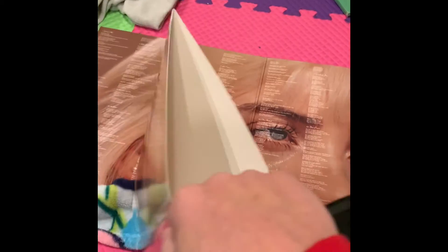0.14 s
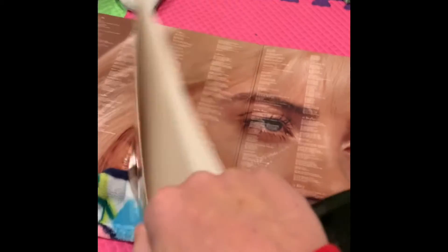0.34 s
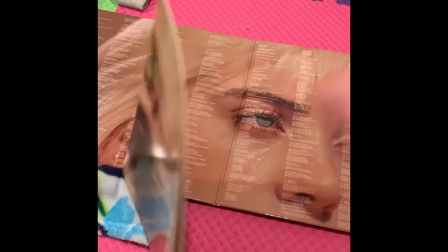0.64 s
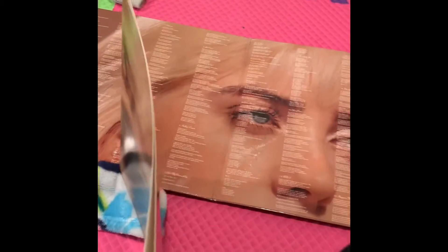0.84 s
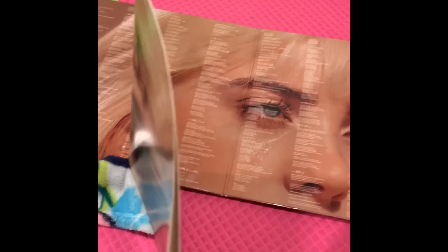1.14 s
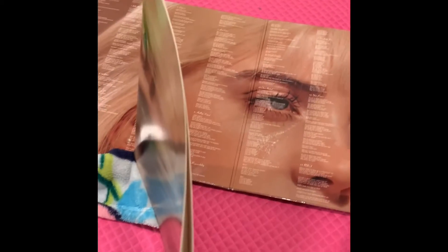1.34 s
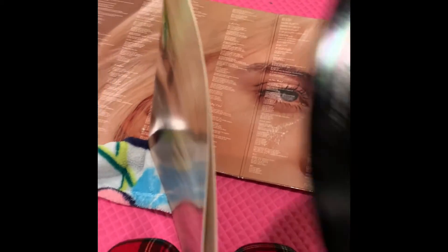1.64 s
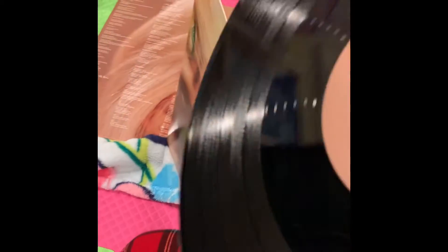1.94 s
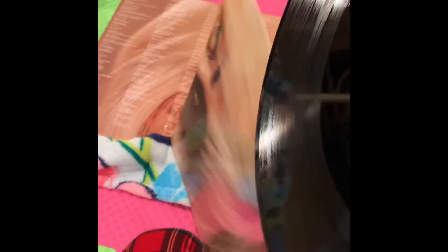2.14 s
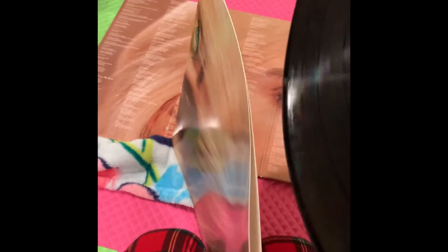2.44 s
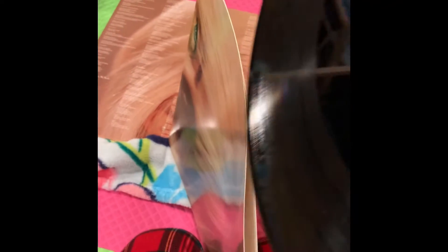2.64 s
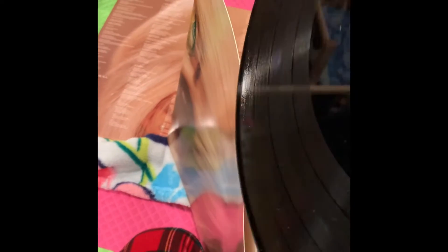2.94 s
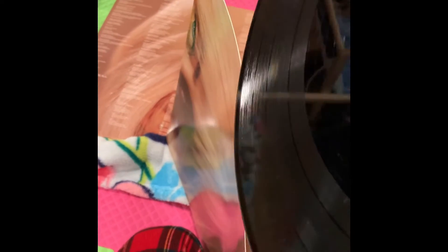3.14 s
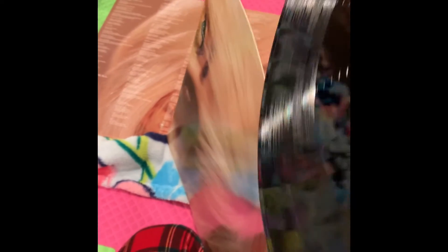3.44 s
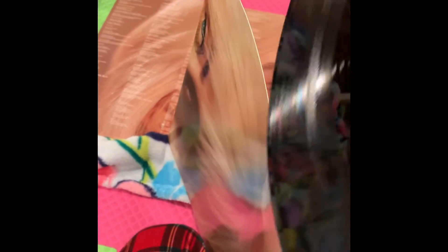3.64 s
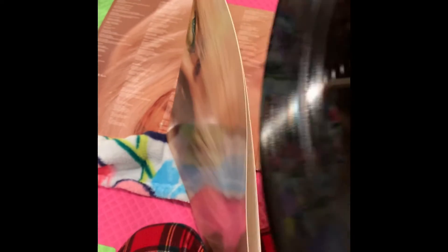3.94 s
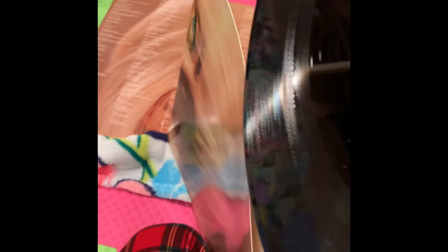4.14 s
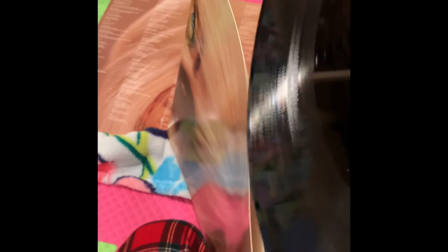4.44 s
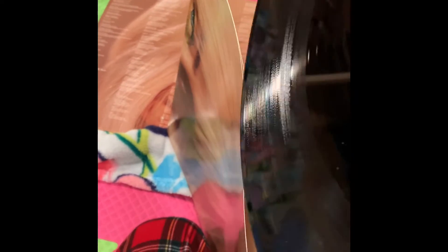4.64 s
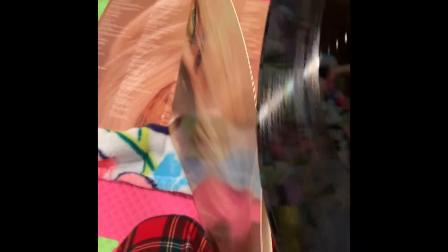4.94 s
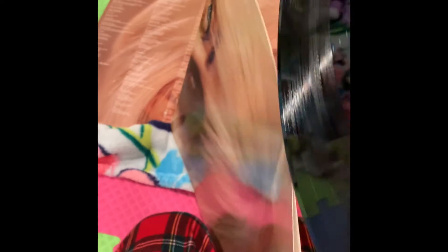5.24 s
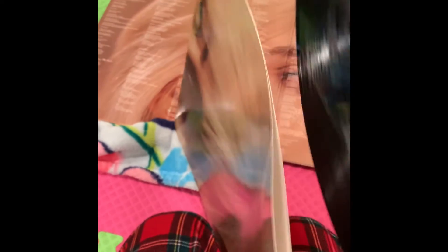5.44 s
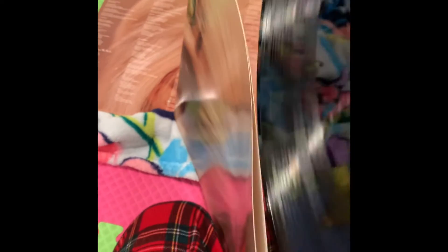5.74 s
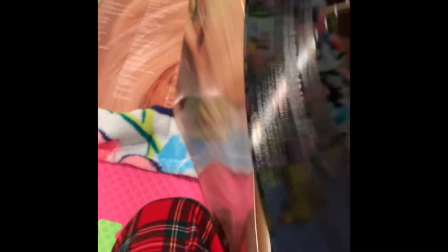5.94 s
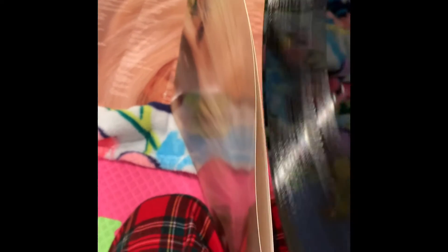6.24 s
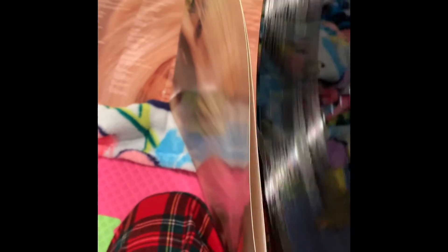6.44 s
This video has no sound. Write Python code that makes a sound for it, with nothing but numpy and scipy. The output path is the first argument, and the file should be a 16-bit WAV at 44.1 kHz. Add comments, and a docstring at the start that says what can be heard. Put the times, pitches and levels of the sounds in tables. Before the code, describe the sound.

Card jacket knocks loudly and rasps as a vinyl record is pulled out, then light disc taps and crisp paper snaps in a small room.

```python
"""In a small furnished room, a vinyl record is drawn from its card jacket and paper sleeve, close by.
Card rasps and paper hisses as they slide: noise made of many tiny clicks, shaped by each rub.
Fizzing, ticks and a short squeak join in. Knocks on the jacket and taps on the disc are bending waves,
quick falling chirps. Rumble, soft air and a faint whine lie underneath."""
import sys
import numpy as np
from scipy import signal
from scipy.fft import rfft, irfft, next_fast_len
from scipy.io import wavfile
from scipy.ndimage import uniform_filter1d

SR = 44100
rng = np.random.default_rng(int(sys.argv[2]) if len(sys.argv) > 2 else 0)


def wav_record(signal):
    """Record a signal, one row per channel, as 16-bit PCM in the file named by sys.argv[1]."""
    frames = np.transpose(np.atleast_2d(signal))
    bounded = np.clip(frames, -1, 1)
    # unit amplitude maps onto the largest positive 16-bit level
    quanta = np.round(bounded * 32767).astype(np.int16)
    wavfile.write(sys.argv[1], SR, quanta)


N = 290602
TIME = np.arange(N) / SR  # seconds

# Sliding strokes of the disc and its sleeves.
# Each row: start in seconds, length in seconds, card rasp in relative dB, paper hiss in relative dB.
STROKES = [(0, 0.059, -55, -59.5), (0.082, 0.083, -59.5, -69), (0.204, 0.1, -61, -68),
           (0.289, 0.12, -51.5, -63.5), (0.409, 0.036, -58, -59.5), (0.439, 0.07, -58, -67),
           (0.55, 0.15, -70, -76), (0.843, 0.11, -61.5, -75.5), (0.953, 0.029, -49.5, -64.5),
           (0.98, 0.14, -59.5, -76.5), (1.362, 0.049, -59.5, -72), (2.019, 0.029, -53.5, -56),
           (2.073, 0.071, -61.5, -72), (2.246, 0.078, -62.5, -73.5), (2.304, 0.012, -48, -58.5),
           (3.391, 0.088, -55.5, -56.5), (3.569, 0.076, -55.5, -55.5), (3.671, 0.024, -51.5, -63),
           (4.928, 0.14, -62.5, -73), (5.352, 0.011, -55.5, -61.5), (5.576, 0.006, -46, -54),
           (5.635, 0.092, -65, -61.5), (5.639, 0.017, -77, -51.5), (5.757, 0.019, -54.5, -59),
           (6.416, 0.03, -66, -69), (6.481, 0.046, -64, -67.5)]
# Brief scuffs of the disc's rim on paper.
# Each row: start in seconds, card rasp in relative dB, paper hiss in relative dB.
SCUFFS = [(2.677, -59.5, -73.5), (2.865, -66, -72.5), (4.041, -53.5, -71), (4.29, -43.5, -65.5),
          (4.382, -50, -68), (4.553, -57.5, -66)]
# The paper snags and lets go with a snap.
# Each row: start in seconds, card rasp in relative dB, paper hiss in relative dB.
SNAGS = [(0.78, -62, -55.5), (.948, -54, -71), (1.242, -45, -81), (1.445, -51, -67.5), (3.4047, -51, -50),
         (3.4637, -44, -42), (3.6045, -43, -42.5), (3.668, -35.5, -59), (3.696, -48, -50),
         (5.6595, -52, -36.5), (5.7605, -36, -61), (5.7785, -50, -50)]
# The jacket's panels flex and rub on each other.
# Each row: start in seconds, length in seconds, level in relative dB.
PANEL_FLEXES = [(.288, .012, -38), (.325, .02, -36), (.4, .02, -43), (.45, .08, -68), (.93, .35, -64),
                (1.335, .03, -52), (1.368, .012, -42), (4.87, .04, -67)]
# Spectra of card, paper and panels. Each row: frequency in Hz, level in relative dB.
RASP_SPECTRUM = [(100, -25), (250, -0.5), (520, -1.5), (900, -5), (1900, -3), (3000, -6.5), (3750, 0),
                 (4500, 0), (6500, -6), (16000, -63)]
HISS_SPECTRUM = [(1500, -12), (3000, -11), (3900, -11.5), (5200, -4.5), (6600, 9), (8200, 4.5), (10500, 0),
                 (12000, -6), (14000, -12.5), (16000, -13.5)]
FLEX_SPECTRUM = [(90, 2.5), (200, 6.5), (420, 5), (750, 0), (1000, -14.5), (1350, -5), (2000, -25),
                 (3200, -31), (8000, -73)]
# The disc glides along the card; the rasp ends at an edge that rises with its speed.
# Each row: time in seconds, edge in Hz, level in relative dB.
GLIDE_PATH = [(.8, 2000, -75), (.86, 2200, -65.5), (.935, 2220, -64.5), (.965, 1930, -61),
              (1.01, 2450, -64.5), (1.1, 2400, -62), (1.27, 2310, -70.5), (1.38, 1890, -86),
              (4.86, 2600, -100), (4.91, 2840, -65), (5.09, 3080, -61.5), (5.17, 2550, -68.5),
              (5.23, 2930, -61.5), (5.36, 2280, -71.5)]
# Spectrum of the glide. Each row: multiple of the edge frequency, level in relative dB.
GLIDE_SHAPE = [(.08, -4.5), (.24, 3), (.72, -4.5), (.95, -0.5), (1.17, -15.5), (1.6, -15.5), (5, -43)]
# The thin edge of the paper fizzes at the height of a fast stroke.
# Each row: start in seconds, length in seconds, level in relative dB.
FIZZES = [(0.96, 0.029, -60.5), (3.432, 0.049, -59.5), (3.594, 0.053, -54.5), (5.658, 0.03, -51)]
# Spectrum of the fizz. Each row: frequency in Hz, level in relative dB.
FIZZ_SPECTRUM = [(5000, -17), (9500, 8), (12500, 0), (15000, -26)]
# The disc's rim catches and slips in a run of separate ticks.
# Each row: start in seconds, length in seconds, level in relative dB.
JUDDERS = [(0.397, 0.02, -54), (3.406, 0.053, -56.5), (3.612, 0.081, -60), (5.754, 0.019, -54.5)]
# Spectrum of those ticks. Each row: frequency in Hz, level in relative dB.
JUDDER_SPECTRUM = [(200, -6), (750, 0), (1050, 6), (1400, -1.5), (2300, -2), (7500, -7.5), (16000, -37)]
# Vinyl squeaks briefly on paper. Each row: time in seconds, pitch in Hz, level in relative dB.
SQUEAK_PATH = [(0.414, 4000, -53), (0.427, 3850, -50), (0.432, 3830, -46), (0.433, 3340, -52),
               (.444, 3300, -64)]
# Knocks on the jacket, then taps on the disc.
# Each row: time in seconds, knock in relative dB, contact time in seconds, thump in relative dB,
# click in relative dB, travel time at 100 Hz in seconds, tone of the struck spot in Hz, tone in relative dB.
KNOCKS = [(.025, -45.5, 0.0062, -58, -82, 0.011, 213, -11), (.2878, -29, 0.0017, -32, -66, .016, 420, -14),
          (.2938, -25.5, 0.0018, -43, -61, 0.021, 470, -1), (.3248, -24.5, 0.0012, -40, -32, 0.03, 435, -5),
          (.417, -49, 0.003, -37, -48, .015, 288, -1), (.543, -55, 0.004, -42, -69, 0.012, 211, -17),
          (.978, -49, 0.0013, -69, -71, 0.017, 400, 2), (1.204, -49, 0.0051, -72, -91, .012, 208, -21),
          (1.3665, -29, 0.002, -26, -66, 0.0079, 730, 6),
          (1.373, -31.5, 0.0044, -29, -80, 0.01218, 308, -9),
          (1.436, -49.5, 0.0057, -36, -62, .018, 65.5, 12.5)]
TAPS = [(2.0165, -46, 0.00089, -35.5, -47, .014, 320, 13), (2.081, -44.5, 0.002, -40, -76, 0.016, 646, -11),
        (2.315, -65.5, 0.0015, -50, -68, 0.024, 486, 15.5), (2.681, -50, 0.0014, -40.5, -80, .03, 650, -10),
        (3.0425, -39.5, 0.0013, -35.5, -74, .019, 284, 12.5),
        (3.0802, -45, 0.0012, -40, -52.5, .016, 504, 3), (3.351, -38, 0.0012, -40, -58, .01, 780, -30),
        (3.443, -38, 0.0016, -39.5, -56, 0.018, 880, -7), (3.637, -48.5, 0.0013, -61, -63, 0.019, 506, -15),
        (3.696, -48, 0.0022, -75, -69, 0.033, 517, 10), (3.978, -50, 0.00074, -76, -60, 0.026, 1000, -22),
        (4.279, -53, 0.0006, -44, -57.5, 0.026, 523, 9), (4.382, -52, 0.00077, -74, -84, 0.019, 590, 7),
        (4.502, -46.5, 0.002, -36.5, -83, 0.027, 374, 1.5), (4.556, -52, 0.00088, -48, -83, 0.019, 523, -2),
        (4.602, -51, 0.0017, -45.5, -79, 0.017, 270, -2),
        (4.764, -45.5, 0.0013, -39.5, -78, 0.0066, 570, 5),
        (5.359, -44, 0.0018, -41.5, -59, 0.017, 300, -20),
        (5.575, -45, 0.0011, -38.5, -40, 0.015, 1060, 2.5),
        (5.606, -59, 0.0011, -46.5, -44.5, 0.021, 496, 7), (6.1465, -37, 0.0019, -37.5, -76, .02, 770, 1.5)]
# Resonances of jacket and disc.
# Each row: frequency in Hz, width in Hz, level in dB relative to the broad response.
JACKET_MODES = [(68.5, 19, 8), (121, 68, 4), (200, 77, 5.5), (290.6, 26, 8.5), (364, 21, 13), (490, 27, 0),
                (1004, 35, 9.5), (1130, 14, 9), (1620, 74, 10.5), (2000, 32, 8)]
DISC_MODES = [(84, 79, -1), (219, 124, 5), (483, 34, 3), (926, 22, -7.5), (1780, 230, -2.5), (2730, 45, 10)]
# Click of a struck edge. Each row: frequency in Hz, level in relative dB.
CARD_CLICK = [(200, -47), (700, -28), (1900, 2.5), (5500, -40.5)]
VINYL_CLICK = [(400, -52), (1900, -22.5), (5500, 6.5)]
# The left port hears less of the disc below the treble. Each row: frequency in Hz, left minus right in dB.
DISC_BALANCE = [(100, -2), (600, -4), (850, -5), (1300, -2.5), (4000, 0)]
# Room decay. Each row: frequency in Hz, time to fall by 60 dB in seconds.
ROOM_T60 = [(80, 0.17), (400, 0.25), (1500, 0.25), (8000, 0.13)]
# Spectra of the background. Each row: frequency in Hz, level in relative dB.
AIR_SPECTRUM = [(100, 11), (170, -9), (300, -4), (600, -7), (1000, -11), (1400, -14.5), (2200, -23),
                (3500, -26), (5000, -25.5), (9000, -30), (11300, -21), (12500, -39.5), (16000, -56)]
RUMBLE_SPECTRUM = [(18, -27), (32, -17.5), (48, -0.5), (60, 3), (80, -11), (115, -11), (170, -20.5),
                   (400, -57.5)]
# A faint whine in the room. Each row: frequency in Hz, level in relative dB.
WHINE = [(1320, -90), (3400, -93.5)]
# How alike noise is at the two microphone ports. Each row: frequency in Hz, likeness from 0 to 1.
LIKENESS = [(100, 0.99), (400, 0.26), (1000, 0.035), (2500, 0.082), (5000, 0.84), (8000, 1), (16000, 1)]
# Loudness between the ports. Each row: frequency in Hz, left minus right in dB.
PORT_BALANCE = [(60, 0), (150, -1), (300, 0.4), (700, 0.2), (1500, -0.6), (4000, 0), (10000, 0.1)]
# Phase between the ports. Each row: frequency in Hz, lead of the left in radians.
PORT_PHASE = [(0, 0), (700, -.3), (1700, 0), (5000, 3.1), (8200, 6.3), (12000, 9.4), (15500, 12.5),
              (22050, 17.5)]

# Longer rubs start and stop more gently: a fixed time in seconds plus a share of the length.
ATTACK_S, ATTACK_SHARE = 0.0034, 0.16
RELEASE_S, RELEASE_SHARE = 0.0017, 0.18
SAG_DB = 0.5  # drop over a rub as the hand slows a little
SCUFF_S, SNAG_S = 0.012, 0.0024  # scuff length and snag decay time, in seconds
# Bare card rasps dully: the top of the rasp opens only as the paper's hiss joins in.
DULL_HZ, OPEN_DB = 2620, -9
TONE_Q = 6  # sharpness of a struck spot's tone
AIR_DB, RUMBLE_DB = -65, -59.5  # background levels, relative dB
CUTOFF_HZ = 16000  # top of the recorded range


def sliding():
    """Strokes, scuffs and snags drive the dull rasp of card and the bright hiss of paper; panels flex."""
    touches = [(rub(s, length), levels_db) for s, length, *levels_db in STROKES]
    touches += [(rub(s, SCUFF_S), levels_db) for s, *levels_db in SCUFFS]
    touches += [(snap(s), levels_db) for s, *levels_db in SNAGS]
    rasp = sum(from_db(rasp_db) * touch for touch, (rasp_db, _) in touches)
    hiss = sum(from_db(hiss_db) * touch for touch, (_, hiss_db) in touches)
    card = friction(RASP_SPECTRUM, slips_per_s=9000, size_db=1.0, judder_db=1.0, patchy_db=4.5)
    paper = friction(HISS_SPECTRUM, slips_per_s=13000, size_db=-8.0, judder_db=1.05, patchy_db=1.5)
    panels = friction(FLEX_SPECTRUM, slips_per_s=1800, size_db=0.5, judder_db=2.5, patchy_db=3.0)
    dull = filtered(card, lambda hz: 1 / (1 + (hz / DULL_HZ) ** 8))
    openness = hiss / (hiss + from_db(OPEN_DB) * rasp)
    card = dull + (card - dull) * openness
    return rasp * card + hiss * paper + sum_of_rubs(PANEL_FLEXES) * panels


def glide():
    """Grainy friction of the disc on card; the whole spectrum slides with the speed."""
    size = 512  # samples per short stretch of sound
    overlap = size * 3 // 4
    flat = [(1, 0)]
    grains = friction(flat, slips_per_s=1400, size_db=2.0, judder_db=1.5, patchy_db=4.0)
    hz, s, cells = signal.stft(grains, SR, nperseg=size, noverlap=overlap)
    path_s, path_hz, _ = np.transpose(GLIDE_PATH)
    edge_hz = np.interp(s, path_s, path_hz)
    cells = cells * from_db(at_hz(GLIDE_SHAPE, hz[:, None] / edge_hz))
    rasp = signal.istft(cells, nperseg=size, noverlap=overlap)[1][:, :N]
    return level(GLIDE_PATH, axis=2) * rms_one(rasp)


def fizz():
    """The edge of the paper gives fine, very bright grains of friction."""
    grains = friction(FIZZ_SPECTRUM, slips_per_s=2900, size_db=1.0, judder_db=-1.0, patchy_db=7.0)
    return grains * sum_of_rubs(FIZZES)


def judder():
    """Stick and slip of the rim: sharp ticks a few milliseconds apart, uneven in spacing and size."""
    gaps_s = rng.uniform(.001, .009, size=N // 40)
    at = (np.cumsum(gaps_s) * SR).astype(int)
    ticks = np.zeros((2, N))
    ticks[:, at[at < N]] = 1
    signs = rng.choice([-1, 1], size=(2, N))
    sizes = from_db(3 * rng.standard_normal(N))
    return coloured(ticks * signs * sizes, JUDDER_SPECTRUM) * sum_of_rubs(JUDDERS)


def squeak():
    """For a moment the slips lock into an unsteady falling tone."""
    s, pitch_hz, _ = np.transpose(SQUEAK_PATH)
    pitch = np.interp(TIME, s, pitch_hz) * (1 + 0.0125 * drift(rate=180))
    tone = np.sin(2 * np.pi * np.cumsum(pitch) / SR)
    return np.sqrt(2) * level(SQUEAK_PATH, axis=2) * tone


def friction(spectrum, slips_per_s, size_db, judder_db, patchy_db):
    """Fibres catch and slip in tiny clicks of uneven size, in clumps."""
    sizes = from_db(size_db * np.minimum(rng.exponential(1, N), 4))
    slipping = rng.random(N) < slips_per_s / SR
    slips = rng.standard_normal((2, N)) * sizes * slipping
    sheet = patches(coloured(slips, spectrum), patchy_db, shift_per_s=35)
    return rms_one(sheet * from_db(judder_db * drift(rate=80)))


def patches(x, depth_db, shift_per_s):
    """As the contact moves over the sheet, narrow stretches of its spectrum swell and fade on their own."""
    size = 512  # samples per short stretch of sound
    overlap = size * 3 // 4
    _, _, cells = signal.stft(x, nperseg=size, noverlap=overlap)
    field = rng.standard_normal(cells.shape[1:])
    frames = max(2, round(4 * SR / size / shift_per_s))
    for _ in range(2):
        field = uniform_filter1d(field, size=4, axis=0)  # smooth across frequency
        field = uniform_filter1d(field, frames, axis=1)  # smooth across time
    cells = cells * from_db(depth_db * rms_one(field))
    return signal.istft(cells, nperseg=size, noverlap=overlap)[1][:, :N]


def rub(start, length):
    """One rub as gain over time: it swells, holds with a slight sag, and dies."""
    t = TIME - start
    early = np.maximum(-t, 0) / (ATTACK_S + ATTACK_SHARE * length)
    late = np.maximum(t - length, 0) / (RELEASE_S + RELEASE_SHARE * length)
    sag = from_db(-SAG_DB * np.clip(t / length, 0, 1))
    return np.exp(-np.minimum(early ** 2 + late, 20)) * sag


def sum_of_rubs(rows):
    """Gain over time of all the rubs in a table of start, length and dB."""
    return sum(from_db(db) * rub(s, length) for s, length, db in rows)


def snap(start):
    """A snag letting go, as gain over time: sudden, then dying."""
    t = TIME - start
    return (t >= 0) * np.exp(-np.clip(t / SNAG_S, 0, 20))


def strikes(rows, modes, click, softness, thump_hz, dispersion, echo_db, echo_path,
            scatter_db, scatter_s, pan_db, gain_db):
    """Bending waves: highs arrive first, lows glide in later; the spot rings, the edges send it back."""
    size = 2 ** 15  # samples per blow
    lead = SR // 100  # room kept ahead of each blow, in samples
    hz = np.maximum(np.fft.rfftfreq(size, 1 / SR), 1)
    t = TIME[:size]
    body = 1 + sum(from_db(db) * resonance(hz, f, width) for f, width, db in modes)
    radiated = 1 / (1 + (42 / hz) ** 2) / np.sqrt(hz * (1 + (hz / 11500) ** 6))
    apart = hz / (hz + 1100)  # the ports differ more towards the treble
    out = np.zeros((2, N + size))
    for s, knock_db, contact_s, thump_db, click_db, glide_s, tone_hz, tone_db in rows:
        travel_s = glide_s * (100 / np.maximum(hz, 45)) ** dispersion
        phase = 2 * np.pi * np.cumsum(travel_s) * SR / size
        # every spot that is struck has its own paths by way of the edges
        paths = 1 + (echo_path - 1) * rng.uniform(.15, 1, size=3)
        echoes = np.exp(-1j * phase * paths[:, None]).sum(axis=0) / (1 + hz / 4500)
        wave = np.exp(-1j * phase) + from_db(echo_db) * echoes
        force = blow(hz, knock_db, contact_s, thump_db, click_db, click, softness, thump_hz)
        contact = causal(force * radiated) * from_db(gain_db) * SR
        spot = 1 + from_db(tone_db) * resonance(hz, tone_hz, tone_hz / TONE_Q)
        # later reflections blur into a short scatter, different at each port
        scatter = rng.standard_normal((2, size)) * from_db(-60 * t / scatter_s)
        mid, side = rfft(scatter / np.linalg.norm(scatter[0]))
        scatter = from_db(scatter_db) * (mid + apart * side * [[1], [-1]]) / (1 + hz / 7000)
        sound = irfft(contact * body * spot * (wave + scatter))
        start = max(round(s * SR) - lead, 0)
        out[:, start:start + size] += np.roll(sound, lead, axis=1)
    return out[:, :N] * from_db(pan_db) ** [[.5], [-.5]]


def blow(hz, knock_db, contact_s, thump_db, click_db, click, softness, thump_hz):
    """Spectrum of a blow: a knock, brighter for a shorter contact, the hand's thump and the edge's click."""
    cycles = hz * contact_s
    knock = from_db(knock_db) * 2 * cycles ** 1.5 / (1 + cycles ** softness)
    thump = from_db(thump_db) / (1 + (hz / thump_hz) ** 4)
    edge = from_db(click_db + at_hz(click, hz))
    return np.sqrt(knock ** 2 + thump ** 2 + edge ** 2)


def resonance(hz, centre, width):
    """Something that rings most strongly at one pitch; its response is 1 at the top."""
    return 1 / (1 + 1j * (hz ** 2 - centre ** 2) / (hz * width))


def causal(gain):
    """Give these gains the phase that lets nothing sound early (minimum phase)."""
    cepstrum = irfft(np.log(gain + 1e-12))
    half = len(cepstrum) // 2
    folded = np.r_[cepstrum[0], 2 * cepstrum[1:half], cepstrum[half]]
    return np.exp(rfft(folded, len(cepstrum)))


def room(x, wet_db, first_s):
    """Diffuse reflections die away octave by octave; the bass stays alike on both sides."""
    t, tail = TIME[:SR // 2], 0
    for hz in 62.5 * 2. ** np.arange(8):
        band = signal.butter(2, [hz / np.sqrt(2), hz * np.sqrt(2)], "band", fs=SR, output="sos")
        mid, side = signal.sosfilt(band, rng.standard_normal((2, len(t))))
        apart = hz / (hz + 450)
        fade = from_db(-60 * t / at_hz(ROOM_T60, hz))
        tail = tail + (mid + apart * side * [[1], [-1]]) / np.hypot(1, apart) * fade
    tail = tail * np.clip(t / first_s - 1, 0, 1)  # silent until the first reflections
    tail = tail * from_db(wet_db) / np.linalg.norm(tail[0])
    return x + signal.fftconvolve(x, tail, axes=1)[:, :N]


def background():
    """Low rumble and soft air are shaped noise; the faint whine is sine tones with a slight wobble."""
    rumble = from_db(RUMBLE_DB) * coloured(rng.standard_normal((2, N)), RUMBLE_SPECTRUM)
    air = from_db(AIR_DB) * coloured(rng.standard_normal((2, N)), AIR_SPECTRUM)
    wobbly_time = np.cumsum(1 + 0.0016 * drift(rate=19)) / SR
    whine = sum(np.sqrt(2) * from_db(db) * np.sin(2 * np.pi * hz * wobbly_time) for hz, db in WHINE)
    return rumble + air + whine


def coloured(pair, spectrum):
    """Two unrelated excitations become a partly alike stereo sound of the given spectrum; rms 1."""
    def alike(hz):
        return np.clip(at_hz(LIKENESS, hz), 0, 1)
    mid = filtered(pair[0], lambda hz: from_db(at_hz(spectrum, hz)) * np.sqrt(1 + alike(hz)))
    side = filtered(pair[1], lambda hz: from_db(at_hz(spectrum, hz)) * np.sqrt(1 - alike(hz)))
    return rms_one(np.array([mid + side, mid - side]))


def drift(rate):
    """Smooth random wander of spread 1, faster for a higher rate."""
    r = np.exp(-80 * np.pi * rate / SR)
    # one value per 40 samples; the first 2000 let the filter settle
    slow = signal.lfilter([1], [1, -2 * r, r * r], rng.standard_normal(N // 40 + 2002))[2000:]
    return np.interp(np.arange(N) / 40, np.arange(len(slow)), rms_one(slow))


def filtered(x, response):
    """Pass x through a response given as a function of Hz."""
    size = next_fast_len(N + SR // 4)
    return irfft(rfft(x, size) * response(np.fft.rfftfreq(size, 1 / SR)), size)[..., :N]


def level(rows, axis):
    """Gain over time from a dB column, practically silent outside its rows."""
    rows = np.array(rows)
    return from_db(np.interp(TIME, rows[:, 0], rows[:, axis], left=-150, right=-150))


def at_hz(points, hz):
    """Read a table along a log-frequency axis."""
    knots, values = np.transpose(points)
    return np.interp(np.log(hz + 1e-9), np.log(knots), values)


def from_db(db):
    """Decibels to gain."""
    return 10 ** (np.asarray(db) / 20)


def rms_one(x):
    """Scale to unit rms."""
    return x / np.sqrt(np.mean(x ** 2) + 1e-20)


def scene():
    """Sliding, knocks and taps in the room, over the background."""
    rubs = sliding() + glide() + fizz() + judder() + squeak()
    jacket = strikes(KNOCKS, JACKET_MODES, CARD_CLICK, softness=4.12, thump_hz=95, dispersion=.9,
                     echo_db=-8.5, echo_path=4.0, scatter_db=-8.0, scatter_s=0.16,
                     pan_db=-1.5, gain_db=-33.0)
    disc = strikes(TAPS, DISC_MODES, VINYL_CLICK, softness=3.65, thump_hz=125, dispersion=1.05,
                   echo_db=-9.0, echo_path=3.2, scatter_db=-4.0, scatter_s=0.048,
                   pan_db=-0.5, gain_db=-32.0)
    disc = filtered(disc, lambda hz: from_db(at_hz(DISC_BALANCE, hz)) ** [[.5], [-.5]])
    rubs = room(rubs, wet_db=-12.0, first_s=0.0028)
    blows = room(jacket + disc, wet_db=-13.0, first_s=0.0034)
    return rubs + blows + background()


def record(dry):
    """Two spaced ports differ in phase and slightly in loudness by pitch; lowest and highest ends are cut."""
    def ports(hz):
        turn = np.interp(hz, *np.transpose(PORT_PHASE))
        balance = from_db(at_hz(PORT_BALANCE, hz)) ** [[.5], [-.5]]
        return balance * np.exp(1j * turn * [[.5], [-.5]])
    low_cut = signal.butter(5, 37, "high", fs=SR, output="sos")  # 37 Hz
    dry = signal.sosfilt(low_cut, dry)
    return filtered(dry, lambda hz: ports(hz) / np.sqrt(1 + (hz / CUTOFF_HZ) ** 120))


dry = scene()
out = record(dry)
wav_record(out)
```